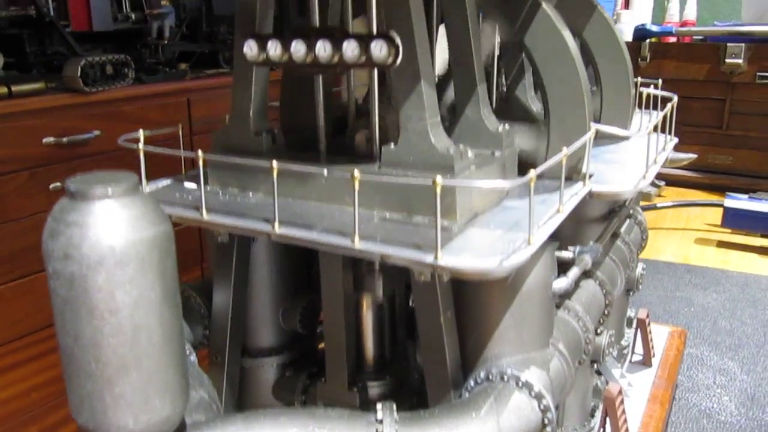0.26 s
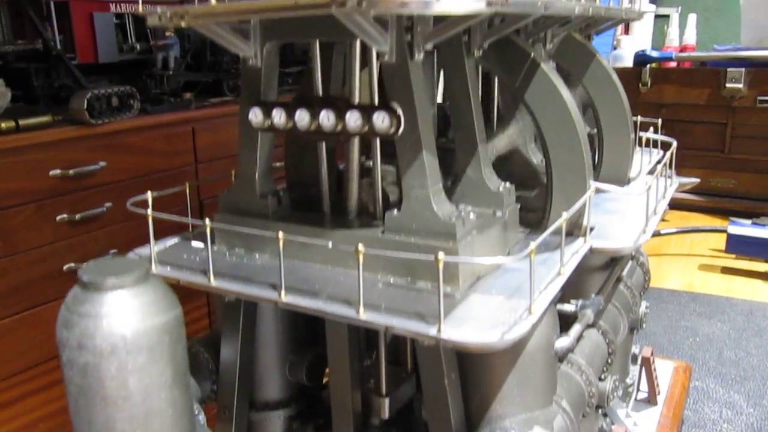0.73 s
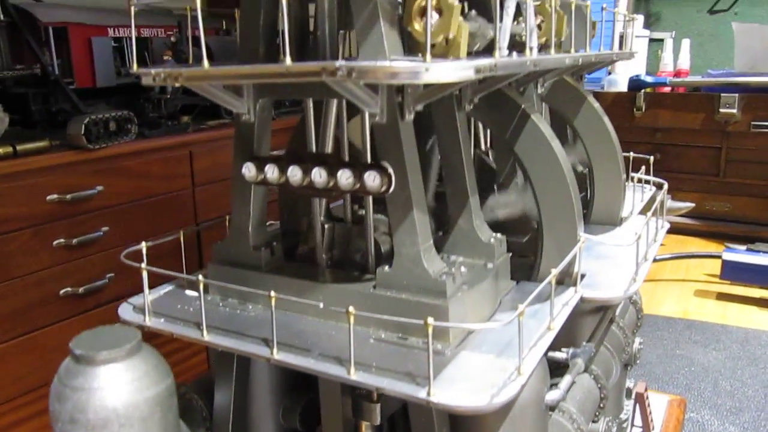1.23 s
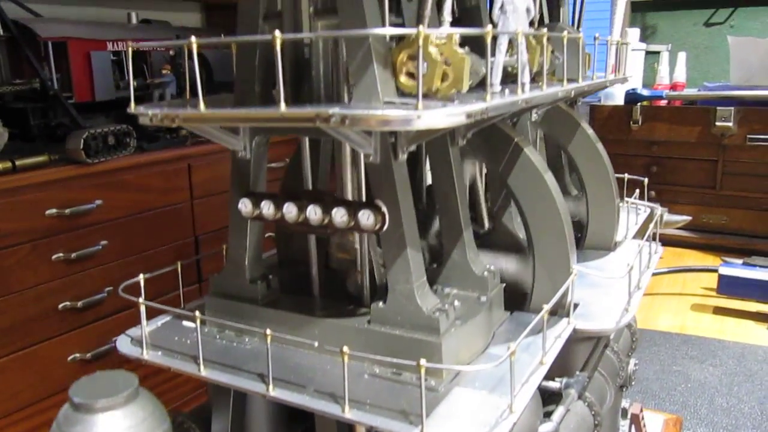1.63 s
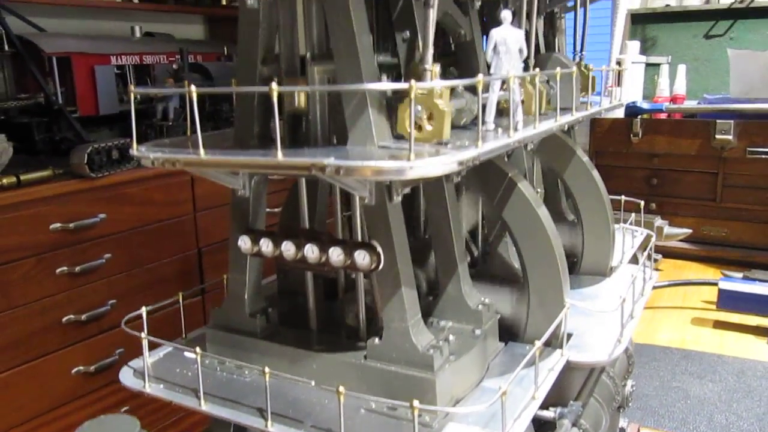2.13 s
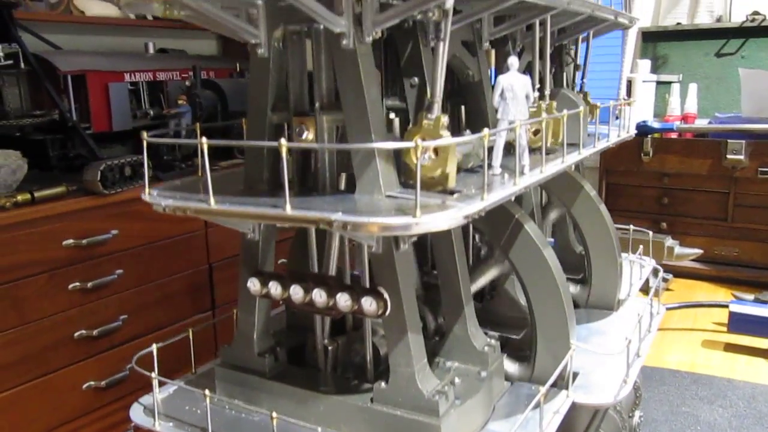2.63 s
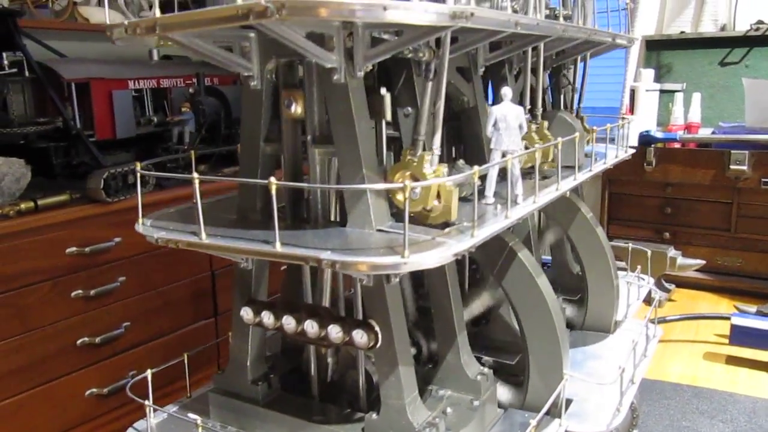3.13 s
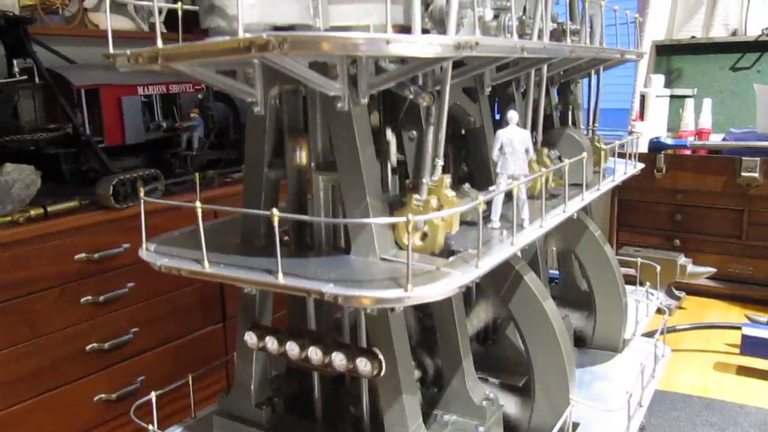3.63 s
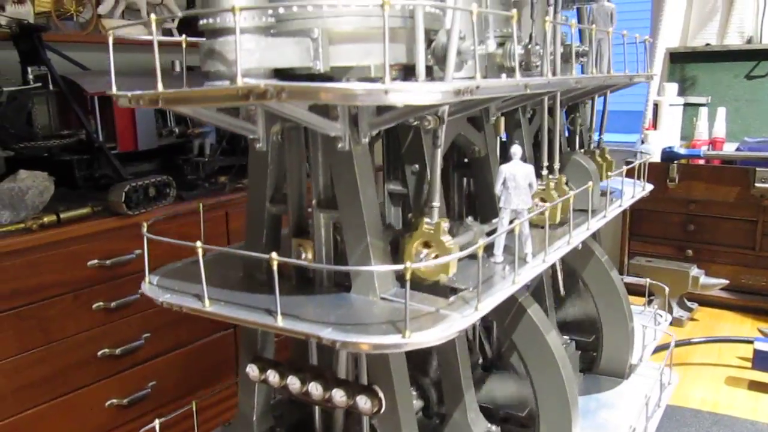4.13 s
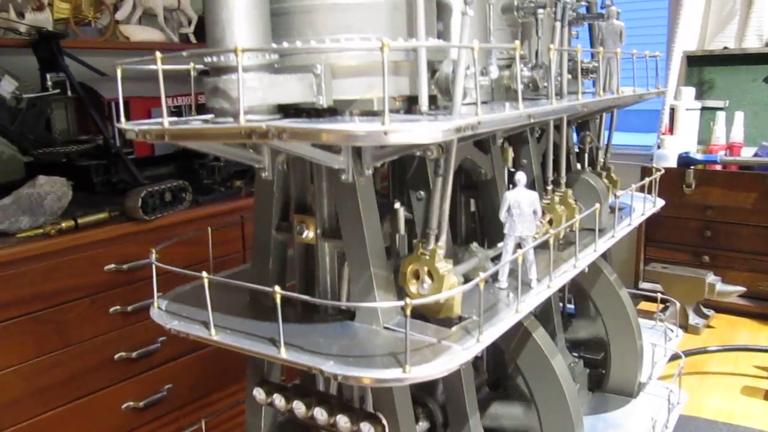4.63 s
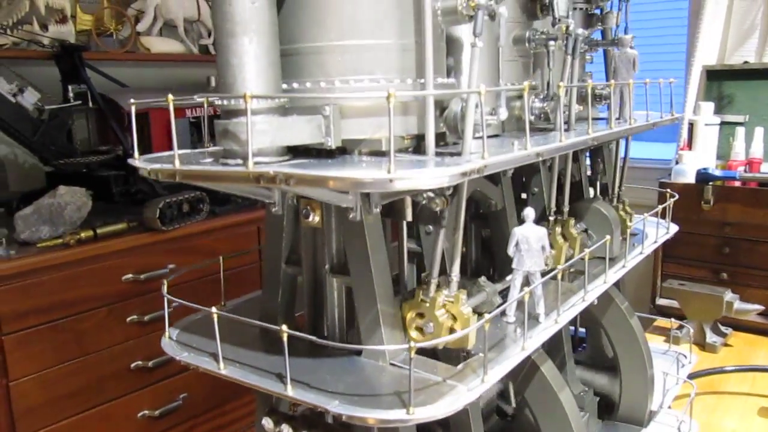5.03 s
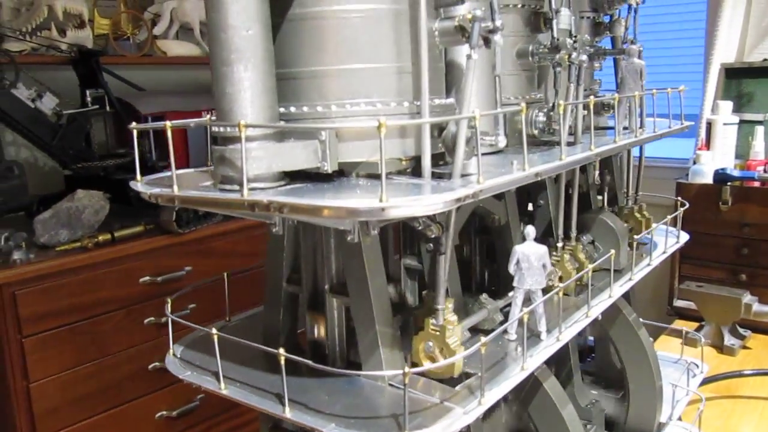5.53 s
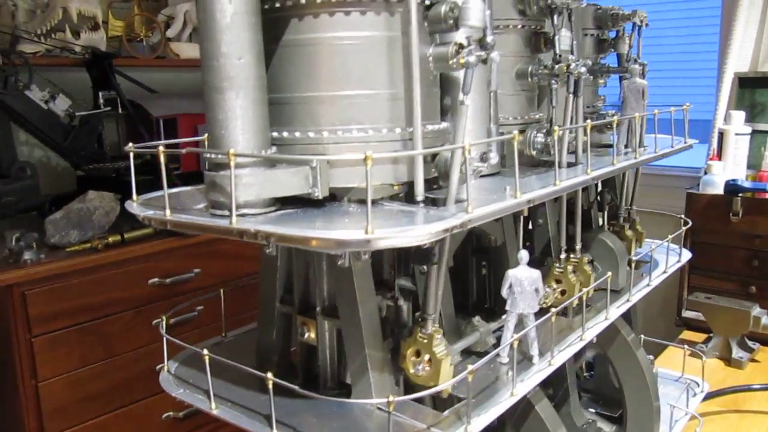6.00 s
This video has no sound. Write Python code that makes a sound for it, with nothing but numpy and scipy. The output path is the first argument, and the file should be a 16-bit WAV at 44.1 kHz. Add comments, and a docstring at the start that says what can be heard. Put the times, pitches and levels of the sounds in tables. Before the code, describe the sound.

A tabletop model steam engine turns slowly indoors, hissing brightly in breathing gusts, with a soft double thud each turn and small squeaks and clicks.

```python
"""Gas hisses through valve ports that ring differently on each stroke; leak jets brighten it in gusts.
A table-top model pumping engine turns slowly indoors, one turn in about 1.7 s. Pump valves thud twice a turn.
The lengthening cylinder space whistles downward, two ports whistle, the opening valve squeaks, pins click.
Hiss is shaped noise gated by crank position, whistles are noise on pitch curves, thuds are decaying modes."""
import sys
import numpy as np
from scipy import signal
from scipy.fft import rfft, irfft
from scipy.io import wavfile
from scipy.ndimage import uniform_filter1d

SR = 44100
rng = np.random.default_rng(int(sys.argv[2]) if len(sys.argv) > 2 else 0)


def volts_from_decibels(level):
    """Turn decibel levels (scalar or array-like) into linear amplitude factors."""
    exponent = np.asarray(level, float) / 20
    return 10 ** exponent


def store_wav(level_fs):
    """Save 16-bit WAV to argv[1]."""
    pcm = np.round(np.clip(np.atleast_2d(level_fs), -1, 1) * 32767)
    wavfile.write(sys.argv[1], SR, pcm.T.astype(np.int16))


N = 276103
TIME_S = np.arange(N) / SR
FREQ_HZ = np.fft.rfftfreq(N, 1 / SR)

# crank, beginning of each turn: start_s
TURN_STARTS = [-1.43, .214, 1.855, 3.552, 5.228, 6.9]
SHORT_STROKE_S, SHORT_STROKE_TURNS = .614, .368  # fixed duration of this first part of every turn
LONG_STROKE_TURNS = (.35, .92)  # start, end

# levels of each turn as the microphone drifts past:
# lower_whistle_short_stroke_db, lower_whistle_long_stroke_db, chest_db, leak_db
TURN_LEVELS = [(-49.5, -40, -45.5, -29.5), (-62, -37, -46.5, -32.5), (-43.5, -36.5, -45.5, -33.5),
               (-45.5, -41, -45, -36), (-49.5, -40.5, -44, -36)]
# levels of each turn, by the side facing the microphone: port_flow_db, side_port_db, strands_db
FACING_LEVELS = [(0.14, -14.5, 4.55), (0.045, -15.5, 1.12), (0.19, -13.5, 0.96), (-0.406, -10, .1),
                 (-0.38, -5, .1)]

# room rumble spectrum: freq_hz, relative_db_per_hz
RUMBLE_SPECTRUM = [(15, -29.5), (28, -15.5), (65, -28), (90, 2), (115, -9), (200, -10.5), (370, -3),
                   (440, 0.5), (510, -30.5), (700, -22.5)]
RUMBLE_DB, LOAD_SWING_DB, LOAD_PEAK_TURNS = -47, 3.5, 0.153
SLACK_TURNS, SLACK_LENGTH_TURNS, SLACK_DB = 0.529, 0.078, -12  # lull as the load comes off
ROOM_TONE_DB = -70
# wooden bed modes: freq_hz, relative_db, t60_s
BED_MODES = [(93.3, -6.5, 0.077), (129.7, -12.5, 0.219), (164.73, -1.5, 0.177), (194, 0, 0.105),
             (262.1, -4, 0.1494), (318.8, -6.5, 0.136), (361.8, -2.5, 0.0942), (442.8, 0, 0.0745),
             (597.8, -5.5, 0.0406), (865, -40, 0.031), (1288.8, -8.5, 0.082)]

# pump valve thuds, a strong then a softer one each turn: nominal_s, ring_peak_db
VALVE_THUDS = [(0.216, -19.5), (0.471, -25), (1.856, -20.5), (2.106, -22.5), (3.552, -19.5), (3.809, -23.5),
               (5.227, -19.5), (5.483, -21)]
BLOW_VARY_DB, BLOW_VARY_RAD = 1.8, .5  # spread of each mode from blow to blow
# linkage clicks: start_s, level_db
PIN_CLICKS = [(0.4643, -23), (2.0994, -25), (3.7953, -32), (4.718, -29), (5.472, -23)]

# squeaks as the valve opens the long stroke: start_s, level_db
VALVE_SQUEAKS = [(.835, -28), (2.471, -30.5), (4.171, -31), (5.848, -30)]
# course of one squeak: after_start_s, pitch_hz, relative_db
SQUEAK_COURSE = [(0, 11340, -14), (.004, 11250, -5), (.008, 10600, -14), (.013, 9800, 1), (.021, 9000, 0),
                 (.026, 8340, -11), (.032, 7700, -5), (.04, 7500, -16)]

# squeals at full stroke: peak_s, level_db
STROKE_SQUEALS = [(.015, -29), (1.65, -30), (3.36, -30), (5.0, -29.5)]
SQUEAL_HZ, SQUEAL_WIDTH_HZ, SQUEAL_RISE_S, SQUEAL_FALL_S = 3180, 240, .1, .07  # times per 10 dB
# cylinder whistle strands: full_stroke_hz, start_extra_hz, level_db, full_from_turns, last_10_db_rise_turns
CYLINDER_STRANDS = [(3150, 6250, -42, .52, .04), (5420, 4700, -39.5, .68, .06), (6450, 9800, -38, .78, .06)]
STRAND_WIDTHS_HZ = (400, 200, 200)
# swells of the low strand: peak_turns, level_db, rise_10_db_turns, fall_10_db_turns
STRAND_FLARES = [(.625, -28.5, .02, .075), (.75, -34, .025, .04)]
WITHDRAW_TURNS = (.38, .88)  # piston withdraws between these
CLOSING_TURNS, CLOSING_FALL_TURNS = .89, .025  # valve shuts the whistle; fall per 10 dB
OUTLET_SPACING_HZ, OUTLET_DIP_DB = 1050, 6  # exhaust pipe modes; dips between them

# valve flow through a turn, alike on every turn: crank_turns, flow_db
VALVE_FLOW = [(0, -30.5), (.085, -29.5), (.162, -27), (.195, -28), (.205, -25), (.222, -26), (.236, -34),
              (.25, -33.5), (.275, -30), (.285, -23), (.3, -20.5), (.322, -26.5), (.352, -32), (.383, -24),
              (.42, -28.5), (.51, -26.5), (.63, -32), (.685, -34), (.735, -29), (.81, -33), (.875, -29.5),
              (.91, -32), (.94, -39), (1, -29.5)]
# port resonances, short stroke: freq_hz, width_hz, relative_db
SHORT_STROKE_PORTS = [(2244, 456, -2.5), (2870, 390, -5), (3270, 805, 0.5), (3894, 210, -13),
                      (4989, 235, -4), (5540, 402, -1), (6614, 1130, -5.5), (9044, 475, -3),
                      (9700, 155, -15.5), (11970, 310, -16.5), (13000, 360, -12.5)]
# port resonances, long stroke: freq_hz, width_hz, relative_db
LONG_STROKE_PORTS = [(2249.5, 383, -6.5), (2904, 325, -3.5), (3363, 194, -1.5), (5544, 543, -10.5),
                     (5962, 451, -4), (7084, 314, -13), (8860, 635, -5), (9490, 146, -6),
                     (11790, 226, -13.5)]
# side port resonances: freq_hz, width_hz, relative_db
SIDE_PORT_MODES = [(3571, 535, 0), (1414, 443, -12)]
# thin castings ringing with the hiss: freq_hz, width_hz, gain_over_hiss_db
CASTING_MODES = [(1349, 30, 4), (2126, 30, 3), (2358, 40, 5), (3190, 25, 2), (3694, 30, 3), (4946, 30, 4),
                 (5276, 35, 3), (5496, 30, 3), (9716, 25, 3)]

# leak jet resonances, short stroke: freq_hz, width_hz, relative_db
SHORT_STROKE_JET = [(7700, 360, -11.5), (8334, 307, -3.5), (8700, 283, 5), (9280, 184, -14.5),
                    (10290, 210, -12), (10220, 154, -9)]
# leak jet resonances, long stroke: freq_hz, width_hz, relative_db
LONG_STROKE_JET = [(8500, 478, 1.5), (9000, 287, -1.5), (9602, 347, -3), (9535, 220, -3.5)]
# leak jet resonances at the turn of the stroke: freq_hz, width_hz, relative_db
STROKE_END_JET = [(8200, 1560, -16.5), (8630, 1004, 3), (9422, 815, 7.5), (9980, 230, 2)]
# bright top of the leak jets: freq_hz, relative_db
JET_TOP_SPECTRUM = [(9000, -25), (10800, 0.5), (11400, -15), (12100, 2.5), (12600, -5), (13200, -6.5),
                    (14500, -8), (15700, -19.5)]
END_JET_STOP_TURNS, END_JET_START_TURNS = .07, .92
LEAK_FOLLOW, STEADY_TOP_DB = 0.63, -56.5  # leak dB per dB of flow; steady brightness
LATE_TURNS, LATE_TOP_DB = (0.53, 0.86), -47.5  # brightness added late in the long stroke
# jets at the turn of the stroke: peak_s, body_db, brightness_db, length_ratio
END_JET_GUSTS = [(.24, -21.5, -36, 0.91), (1.852, -21.5, -28, 0.97), (3.554, -20, -29.5, 0.954),
                 (5.23, -21.5, -27, 0.947)]
# jets as the second thud lands: peak_s, body_db, brightness_db, length_ratio
MID_JET_GUSTS = [(.47, -26, -46, 0.8), (2.126, -30, -43.5, 0.77), (3.802, -26, -51.5, 1.23),
                 (5.474, -30, -43.5, 0.95)]
# jets riding the exhaust puff: peak_s, body_db, brightness_db, length_ratio
PUFF_JET_GUSTS = [(.716, -28, -33.5, 0.93), (2.354, -28.5, -35, 0.85), (4.056, -22, -43.5, 1.09),
                  (5.728, -29.5, -31, 1)]
# slow swells on the long stroke: peak_s, body_db, brightness_db, length_ratio
SWELL_GUSTS = [(1.1, -24, -40.5, 1.09), (2.8, -22, -36.5, 0.985), (4.52, -24.5, -38, 0.897),
               (6.17, -22.5, -32, 0.917)]
# jet shapes: rise_10_db_s, fall_10_db_s, brightness_delay_s, crest_bluntness (length_ratio scales rise and fall)
END_SHAPE, MID_SHAPE = (0.157, 0.129, 0.0079, 2.1), (0.081, 0.056, 0.1, 1.47)
PUFF_SHAPE, SWELL_SHAPE = (0.0633, 0.0573, 0.035, 1.19), (0.213, 0.2184, 0.0816, 2.41)
TOP_LENGTH_RATIO = 0.733  # brightness gusts are this much shorter

# valve chest spectrum: freq_hz, relative_db
CHEST_SPECTRUM = [(300, -12), (450, -2.5), (600, -3.5), (900, 1.5), (1150, -3), (1350, -7), (1800, -4),
                  (2300, -16)]
# gulps in the valve chest: peak_s, level_db, fall_10_db_s
CHEST_GULPS = [(.22, -42, 0.32), (1.45, -37.5, 0.1454), (1.852, -41, 0.2239), (3.139, -36, 0.09),
               (3.554, -45.5, 0.2339), (4.796, -35.5, 0.1627), (5.23, -41, 0.16)]
CHEST_FOLLOW = 0.963  # dB per dB of flow

# upper port whistles up: peak_s, level_db, fall_10_db_s (sign ignored)
UPPER_PIPINGS = [(.044, -29, 0.01), (.36, -23, 0.1719), (.566, -24, 0.0677), (0.717, -26, 0.115),
                 (.846, -33, 0.26), (1.52, -32.5, 0.2655), (1.97, -29, 0.2), (2.206, -25, 0.053),
                 (2.353, -22, 0.0625), (2.5, -31.5, 0.1), (2.944, -29.5, 0.1), (3.64, -34.5, 0.3),
                 (3.908, -25, 0.0451), (4.056, -39.5, 0.1548), (5.35, -26, -0.0533), (5.571, -32, 0.32),
                 (5.9, -31, -0.06), (6.144, -28.5, 0.26)]
PIPING_RISE_RATIO = 0.525  # rise time over fall time
UPPER_DB, UPPER_FOLLOW = -38.5, 0.27  # steady whistle; dB per dB of flow
# lower port whistle: at_s, pitch_hz, narrow_power_share
LOWER_WHISTLE = [(0, 4260, 0.65), (1.1, 4332, 0.84), (2.8, 4299, 0.91), (4.098, 4205, 0.37),
                 (6.26, 4230, .2)]
LOWER_SHORT_FOLLOW, LOWER_LONG_FOLLOW = 1.3, .35  # dB per dB of flow on each stroke
LOWER_ON_TURNS, LOWER_TILT_DB = (.375, .92), -1.2  # tilt: long-stroke level goes from minus to plus this
LOWER_DROOP_HZ = 80  # sag as the long stroke ends
SPIT_TURNS, SPIT_LENGTH_TURNS, SPIT_DB = 0.35, 0.022, -37  # thin high spit as the valve crosses over


def evened(x):
    """Scales to rms 1."""
    return x / np.sqrt(np.mean(x ** 2) + 1e-20)


def add(mix, start_s, sound):
    """Mixes a sound in at a time, cut at the end of the mix."""
    part = mix[round(start_s * SR):][:len(sound)]
    part += sound[:len(part)]


def noise(gain):
    """Gaussian noise of rms 1 with the given gain per frequency."""
    spectrum = rng.standard_normal(len(FREQ_HZ)) + 1j * rng.standard_normal(len(FREQ_HZ))
    return evened(irfft(gain * spectrum, N))


def shape(points):
    """Gain of a drawn spectrum, dB linear over log frequency."""
    hz, db = np.transpose(points)
    return volts_from_decibels(np.interp(np.log(FREQ_HZ + 1), np.log(hz + 1), db))


def peaks(modes, steep=1.2186):
    """Gain of resonances whose powers add."""
    return np.sqrt(sum(volts_from_decibels(2 * db) / (1 + (2 * (FREQ_HZ - hz) / width_hz) ** 2) ** steep
                       for hz, width_hz, db in modes))


def whistle(pitch_hz, width_hz):
    """A narrow band of noise carried along a pitch curve."""
    z = rng.standard_normal(len(pitch_hz)) + 1j * rng.standard_normal(len(pitch_hz))
    r = np.exp(-np.pi * abs(width_hz) / SR)
    z = signal.lfilter([1], [1, -2 * r, r * r], z)
    z = z * np.sqrt((1 - r * r) ** 3 / (1 + r * r))  # unit power whatever the width
    return (z * np.exp(2j * np.pi * np.cumsum(pitch_hz) / SR)).real


def turbulent(x, patch_db, flicker_db):
    """Eddies: patches of the spectrum swell and sink, and the whole band flutters."""
    _, _, z = signal.stft(x, nperseg=256, noverlap=192)
    field = rng.standard_normal(z.shape[::-1]).T
    patch = evened(uniform_filter1d(uniform_filter1d(field, size=2, axis=0), size=40, axis=1))
    flicker = evened(uniform_filter1d(rng.standard_normal(z.shape[1]), size=5))
    z = z * volts_from_decibels(patch_db * patch + flicker_db * flicker)
    return signal.istft(z, nperseg=256, noverlap=192)[1][:N]


def gust(x, at, db, rise, fall, blunt=1.54):
    """Power of a swell that loses 10 dB over the rise before its peak and the fall after; blunt 2 = round."""
    span = np.where(x < at, abs(rise), abs(fall))
    return volts_from_decibels(2 * np.maximum(db - 10 * (abs(x - at) / span) ** blunt, -120))


def crank():
    """Turns made so far: a short stroke of fixed duration, then the long one fills the turn."""
    marks_s = np.ravel([(s, s + SHORT_STROKE_S) for s in TURN_STARTS])
    marks_turns = np.ravel([(k, k + SHORT_STROKE_TURNS) for k in range(len(TURN_STARTS))])
    return np.interp(TIME_S, marks_s, marks_turns)


def during(start_turns, stop_turns):
    """Share 0-1 that is 1 between two crank positions, with soft edges."""
    turn = crank() % 1
    inside = 1. * ((turn > start_turns) & (turn < stop_turns))
    return np.clip(uniform_filter1d(inside, size=1500), 0, 1)


def drift(table):
    """Levels of each turn, joined softly."""
    return uniform_filter1d(np.array(table, float)[crank().astype(int)], size=4000, axis=0).T


def either(share, a, b):
    """Noise through resonances a or b, crossfaded at constant power."""
    return np.sqrt(share) * noise(peaks(a)) + np.sqrt(1 - share) * noise(peaks(b))


def room():
    """Rumble that swells with the load and rings the bed, over a faint deep room tone."""
    bed = noise(peaks([(hz, 2.05 / t60_s, db) for hz, db, t60_s in BED_MODES]))
    turn = crank() % 1
    load_db = RUMBLE_DB + LOAD_SWING_DB * np.cos(2 * np.pi * (turn - LOAD_PEAK_TURNS))
    load_db += SLACK_DB * np.exp(-((turn - SLACK_TURNS) / SLACK_LENGTH_TURNS) ** 2)
    rumble = volts_from_decibels(load_db) * (noise(shape(RUMBLE_SPECTRUM)) + volts_from_decibels(-2.5) * bed)
    tone = volts_from_decibels(ROOM_TONE_DB) * noise(peaks([(30, 48, 0)]))
    return turbulent(rumble, patch_db=0.84, flicker_db=0.95) + tone


def clicks():
    """Brief bright ticks of loose pins: three decaying high partials."""
    out, t = np.zeros(N), np.arange(SR // 50) / SR
    partials = sum(np.sin(2 * np.pi * hz * t) for hz in (9300, 10100, 10900)) / 2
    for start_s, db in PIN_CLICKS:
        add(out, start_s, volts_from_decibels(db - 60 * t / 0.018) * partials)
    return out


def thuds():
    """A metal tick with a soft blow, then two bounces, ring the bed modes."""
    out, t = np.zeros(N), np.arange(SR // 3) / SR
    rise = 1 - np.exp(-(t / 0.00977) ** 2)
    tick = volts_from_decibels(-60 * t / 0.0199) * np.sin(2 * np.pi * 1000 * t)
    luck = rng.standard_normal((len(VALVE_THUDS), 2, len(BED_MODES)))
    for (at_s, db), (wobble, lag) in zip(VALVE_THUDS, luck):
        ring = np.zeros(len(t))
        for (hz, mode_db, t60_s), w, p in zip(BED_MODES, wobble, lag):
            decay = volts_from_decibels(mode_db + BLOW_VARY_DB * w - 60 * t / t60_s)
            ring += decay * np.sin(2 * np.pi * hz * t + BLOW_VARY_RAD * p)
        ring = rise * ring
        ring = ring / abs(ring).max()
        add(out, at_s - .006, volts_from_decibels(db) * (volts_from_decibels(-7) * tick + ring))
        add(out, at_s + .023, volts_from_decibels(db - 6) * ring)
        add(out, at_s + .052, volts_from_decibels(db - 12.0) * ring)
    return out


def squeaks():
    """A short falling whistle through the opening valve: a sine along a pitch curve."""
    out, (at_s, pitch_hz, relative_db) = np.zeros(N), np.transpose(SQUEAK_COURSE)
    t = np.arange(0, at_s[-1], 1 / SR)
    tone = np.sqrt(2) * np.sin(2 * np.pi * np.cumsum(np.interp(t, at_s, pitch_hz)) / SR)
    for start_s, db in VALVE_SQUEAKS:
        add(out, start_s, volts_from_decibels(db + np.interp(t, at_s, relative_db)) * tone)
    return out


def squeals():
    """Steady-pitched narrow noise that swells at full stroke."""
    power = sum(gust(TIME_S, s, db, SQUEAL_RISE_S, SQUEAL_FALL_S, blunt=2.35) for s, db in STROKE_SQUEALS)
    return np.sqrt(power) * whistle(np.full(N, SQUEAL_HZ), SQUEAL_WIDTH_HZ)


def cylinder():
    """Three strands fall as the gas column lengthens, flaring at pipe modes; squeals share their eddies."""
    turn = crank() % 1
    left = (1 + np.cos(np.pi * np.interp(turn, WITHDRAW_TURNS, (0, 1)))) / 2  # stroke still to go, 1-0
    closing = gust(np.maximum(turn, CLOSING_TURNS), CLOSING_TURNS, 0, 1, CLOSING_FALL_TURNS)
    gain = np.sqrt(closing) * volts_from_decibels(drift(FACING_LEVELS)[-1])
    flares = [sum(gust(turn, *flare) for flare in STRAND_FLARES), 0, 0]
    out = np.zeros(N)
    for strand, width_hz, flare in zip(CYLINDER_STRANDS, STRAND_WIDTHS_HZ, flares):
        end_hz, span_hz, db, full_turns, rise_turns = strand
        pitch_hz = end_hz + span_hz * left
        dip_db = OUTLET_DIP_DB * np.sin(np.pi * pitch_hz / OUTLET_SPACING_HZ) ** 2
        power = gust(np.minimum(turn, full_turns), full_turns, db, rise_turns, 1) + flare
        out += np.sqrt(power) * volts_from_decibels(-dip_db) * whistle(pitch_hz, width_hz)
    return turbulent(gain * out + squeals(), patch_db=1.5, flicker_db=2.0)


def port_flow(flow_db):
    """Valve flow hisses through the stroke's port resonances; a side port adds a level set per turn."""
    near_db, side_db, _ = drift(FACING_LEVELS)
    ports = either(during(*LONG_STROKE_TURNS), LONG_STROKE_PORTS, SHORT_STROKE_PORTS)
    return volts_from_decibels(flow_db) * (volts_from_decibels(near_db) * ports + volts_from_decibels(side_db) * noise(peaks(SIDE_PORT_MODES)))


def jet_gains(leak_db):
    """Gain of the leak jet and of its bright top: steady powers plus gusts."""
    body = volts_from_decibels(2 * leak_db)
    top = volts_from_decibels(2 * STEADY_TOP_DB) + during(*LATE_TURNS) * volts_from_decibels(2 * LATE_TOP_DB)
    kinds = ((END_JET_GUSTS, END_SHAPE), (MID_JET_GUSTS, MID_SHAPE),
             (PUFF_JET_GUSTS, PUFF_SHAPE), (SWELL_GUSTS, SWELL_SHAPE))
    for rows, (rise_s, fall_s, late_s, blunt) in kinds:
        for s, body_db, top_db, length in rows:
            body = body + gust(TIME_S, s, body_db, length * rise_s, length * fall_s, blunt)
            top_length = TOP_LENGTH_RATIO * length
            top = top + gust(TIME_S, s + late_s, top_db, top_length * (rise_s + late_s),
                             top_length * fall_s, blunt)
    return np.sqrt(body), np.sqrt(top)


def leak_jets(leak_db):
    """Leaking gas: resonant noise per stroke, another set at the stroke ends, and a bright top."""
    body, top = jet_gains(leak_db)
    mid = during(END_JET_STOP_TURNS, END_JET_START_TURNS)
    stroke_jet = either(during(*LONG_STROKE_TURNS), LONG_STROKE_JET, SHORT_STROKE_JET)
    end_jet = noise(peaks(STROKE_END_JET))
    jet = np.sqrt(mid) * stroke_jet + np.sqrt(1 - mid) * end_jet
    return body * jet + top * noise(shape(JET_TOP_SPECTRUM))


def chest_rush(level_db):
    """Rush in the valve chest: broad low noise with slow gulps."""
    power = volts_from_decibels(2 * level_db) + sum(gust(TIME_S, s, db, fall_s / 2, fall_s) for s, db, fall_s in CHEST_GULPS)
    return np.sqrt(power) * noise(shape(CHEST_SPECTRUM))


def upper_whistle(level_db):
    """Upper port: one resonance excited by a steady flow and by pipings."""
    power = volts_from_decibels(2 * level_db) + sum(gust(TIME_S, s, db, PIPING_RISE_RATIO * fall_s, fall_s)
                                    for s, db, fall_s in UPPER_PIPINGS)
    return np.sqrt(power) * noise(peaks([(7391, 470, 0)]))


def lower_whistle(short_db, long_db, flow_db):
    """Lower port: a narrow and a wide noise band on one pitch curve, levels following the flow."""
    turn, sings = crank() % 1, during(*LOWER_ON_TURNS)
    long_db = long_db + LOWER_TILT_DB * np.interp(turn, LONG_STROKE_TURNS, (-1, 1))
    long_db = long_db + LOWER_LONG_FOLLOW * flow_db
    short_db = short_db + LOWER_SHORT_FOLLOW * flow_db
    at_s, *curves = np.transpose(LOWER_WHISTLE)
    pitch_hz, narrow = (np.interp(TIME_S, at_s, c) for c in curves)
    narrow = np.clip(narrow, 0, 1)
    pitch_hz = pitch_hz - LOWER_DROOP_HZ * np.interp(turn, (.85, .92), (0, 1))
    tone = np.sqrt(narrow) * whistle(pitch_hz, 115.3) + np.sqrt(1 - narrow) * whistle(pitch_hz, 685)
    return volts_from_decibels(sings * long_db + (1 - sings) * short_db) * tone


def crossover_spit():
    """A thin high burst of noise as the valve crosses over."""
    pulse = np.exp(-((crank() % 1 - SPIT_TURNS) / SPIT_LENGTH_TURNS) ** 2)
    return volts_from_decibels(SPIT_DB) * pulse * noise(peaks([(14400, 2100, 0)]))


def gas():
    """Ports, leaks, chest and port whistles together ring the castings and flutter with eddies."""
    valve_db = np.interp(crank() % 1, *np.transpose(VALVE_FLOW))
    flow_db = valve_db - valve_db.mean()
    short_db, long_db, chest_db, leak_db = drift(TURN_LEVELS)
    hiss = port_flow(valve_db) + leak_jets(leak_db + LEAK_FOLLOW * flow_db)
    hiss += chest_rush(chest_db + CHEST_FOLLOW * flow_db)
    hiss += upper_whistle(UPPER_DB + UPPER_FOLLOW * flow_db)
    hiss += lower_whistle(short_db, long_db, flow_db) + crossover_spit()
    casting_db = sum(db / (1 + (2 * (FREQ_HZ - hz) / width_hz) ** 2) for hz, width_hz, db in CASTING_MODES)
    hiss = irfft(rfft(hiss) * volts_from_decibels(casting_db), N)
    return turbulent(hiss, patch_db=2.1, flicker_db=0.6)


def scene():
    """All sources at one microphone."""
    return (room() + clicks() + thuds() + squeaks() + cylinder() + gas())[None]


def low_pass(x):
    """Removes everything above the highest recorded frequency."""
    return signal.sosfilt(signal.butter(12, 15750, fs=SR, output="sos"), x)


def record(dry):
    """The microphone dulls the top."""
    # microphone response: freq_hz, gain_db
    response = [(20, -1.5), (11000, -0.5), (13000, -4), (14500, -9.5), (16000, -9.5)]
    mix = irfft(rfft(dry) * shape(response), N)
    return low_pass(mix)


dry = scene()
out = record(dry)
store_wav(out)
```